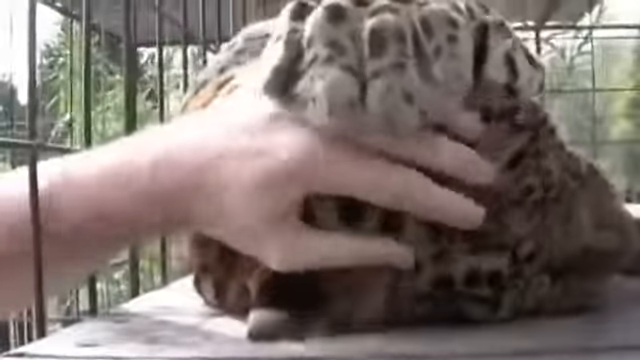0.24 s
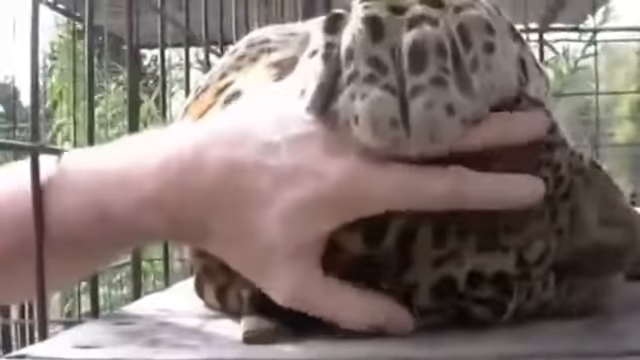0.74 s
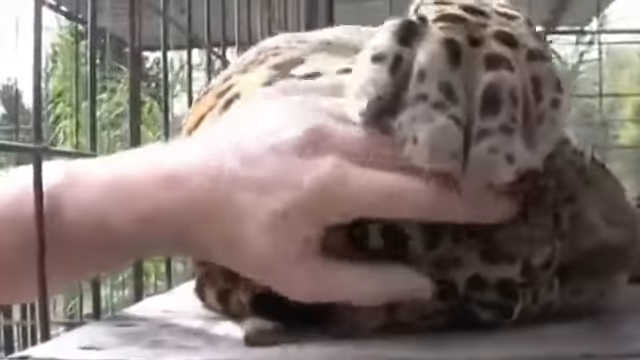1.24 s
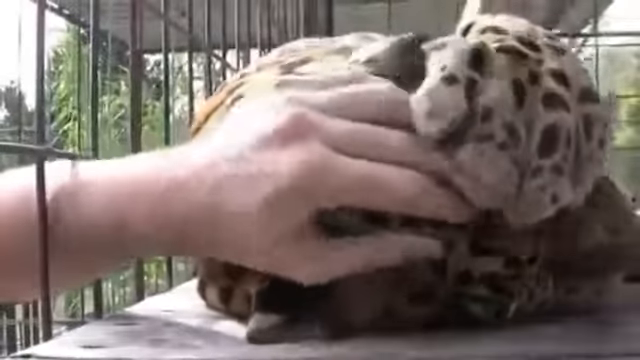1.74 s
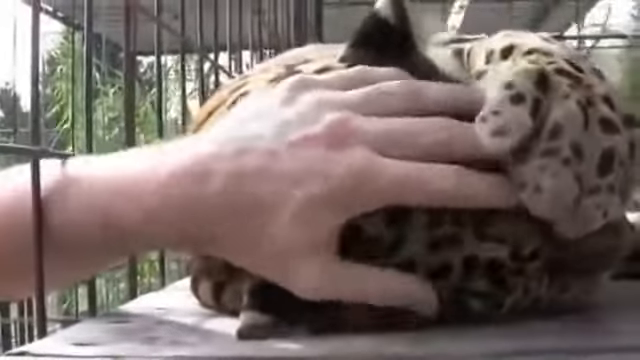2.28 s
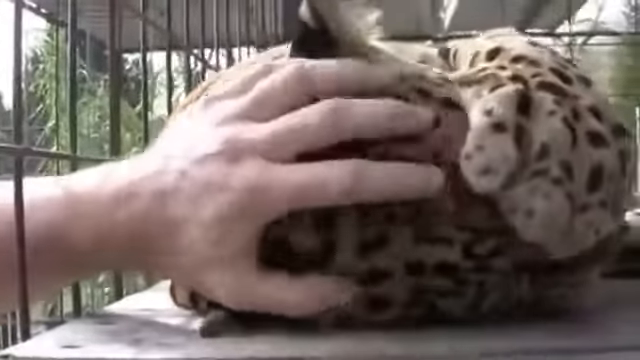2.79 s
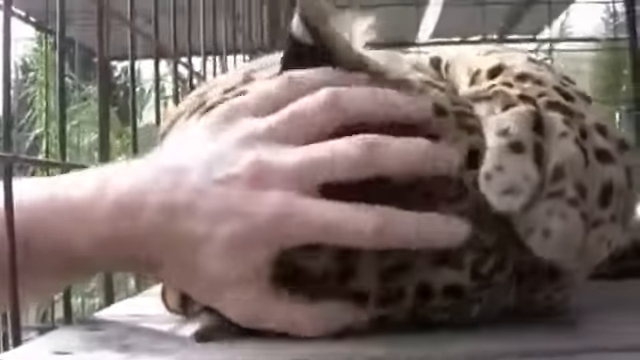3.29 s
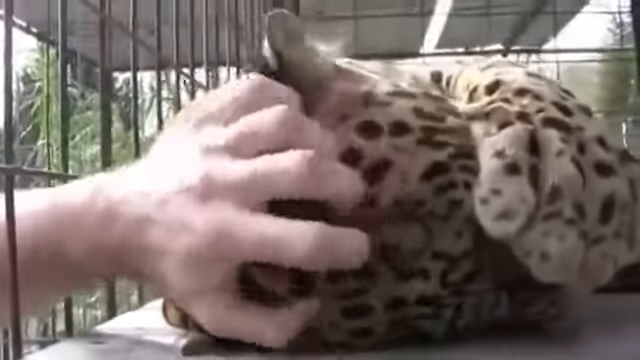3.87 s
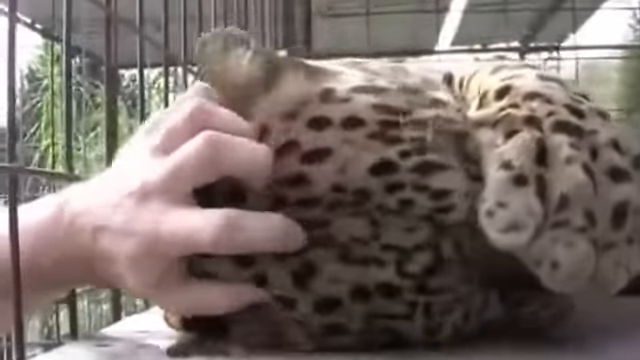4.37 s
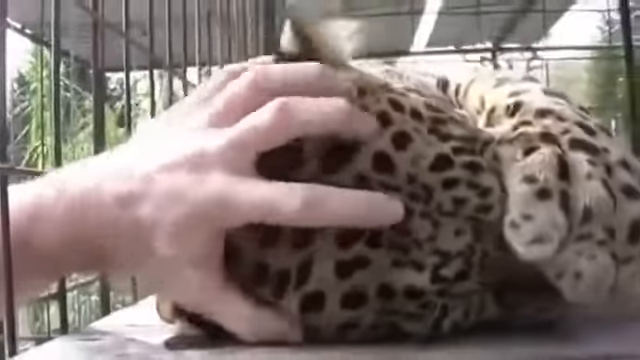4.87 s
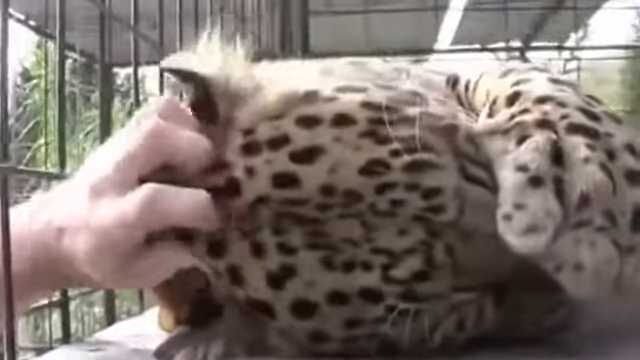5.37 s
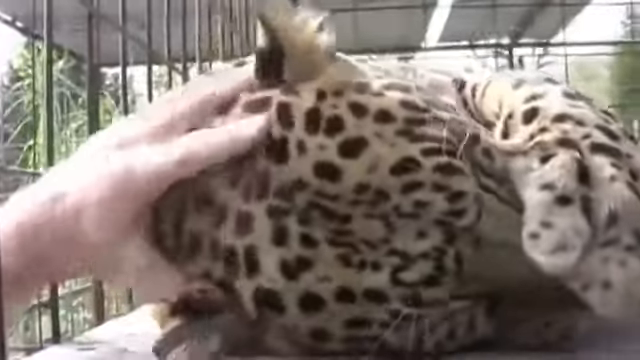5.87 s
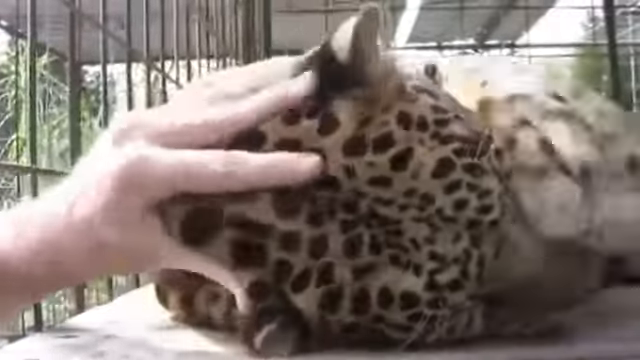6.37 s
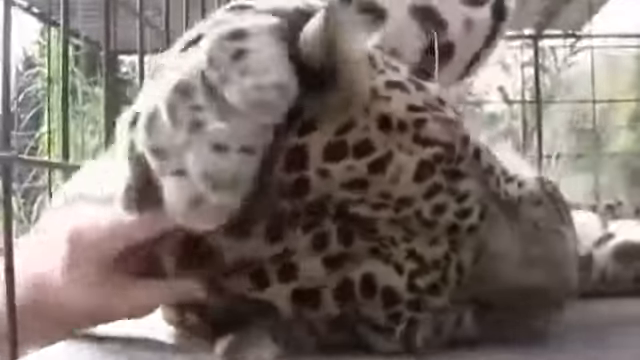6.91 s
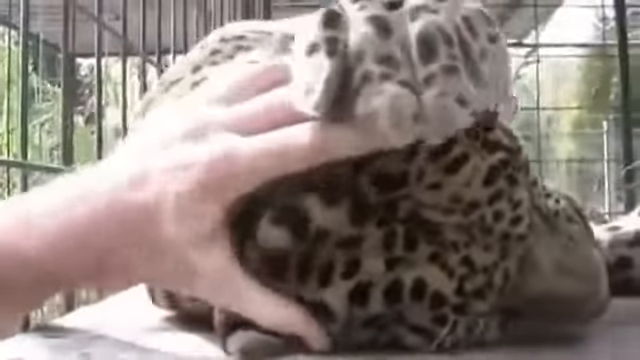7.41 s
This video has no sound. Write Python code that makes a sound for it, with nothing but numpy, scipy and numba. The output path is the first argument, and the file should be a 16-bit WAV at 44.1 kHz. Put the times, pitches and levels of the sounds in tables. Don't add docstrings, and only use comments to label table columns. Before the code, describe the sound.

A big cat growls continuously up close, a deep rattling throaty rumble of separate pulses, over leaf hiss, wind puffs and faint ticks outdoors.

```python
import sys
import numpy as np
from scipy import signal
from scipy.fft import rfft, irfft
from scipy.io import wavfile
from scipy.ndimage import uniform_filter1d
from numba import njit

SR = 44100
rng = np.random.default_rng(int(sys.argv[2]) if len(sys.argv) > 2 else 0)


def to_linear_factor(level_db):
    exponent = np.asarray(level_db, float) / 20
    return 10 ** exponent


def output_pcm(signal):
    pcm = np.clip(np.atleast_2d(signal).T, -1, 1) * 32767
    wavfile.write(sys.argv[1], SR, np.round(pcm).astype(np.int16))


N = 337365


def rows(table):
    s, *columns = np.transpose(table)
    return [np.interp(np.arange(N) / SR, s, c) for c in columns]


def unit(x):
    return x / np.sqrt(np.mean(x ** 2))


@njit
def svf(x, hz, width):
    y, b, l = np.empty((2, len(x))), 0., 0.
    for i in range(len(x)):
        g, k = np.tan(np.pi * hz[i] / SR), width[i] / hz[i]
        v = (b + g * (x[i] - l)) / (1 + g * (g + k))
        y[0, i], y[1, i] = k * (l + g * v), k * v
        b, l = 2 * v - b, l + 2 * g * v
    return y


def band(x, hz, width):
    return svf(x + 1e-18, hz + np.zeros(N), width + np.zeros(N))[1]


def two_bands(x, hz, width, outer_width):
    return unit(band(band(x, hz, width), hz, outer_width))


def high_pass(x, hz):
    return signal.sosfilt(signal.butter(2, hz, "high", fs=SR, output="sos"), x)


def soft(x, hz):
    return signal.sosfilt(signal.butter(4, hz, fs=SR, output="sos"), x)


def clicks(s, size):
    at = np.clip(s * SR, 0, N - 2)
    i, part = at.astype(int), at % 1
    return np.bincount(i, size * (1 - part), N) + np.bincount(i + 1, size * part, N)


def walk(rate):
    k = int(SR / rate)
    steps = np.repeat(rng.standard_normal(N // k + 1), k)
    return uniform_filter1d(uniform_filter1d(steps, k), k)[:N]


def swells(events, rise, fall):
    t = np.arange(N) / SR
    total = np.zeros(N)
    for s, hold, db in events:
        end = s + rise + hold + fall
        total += db * np.clip(np.minimum((t - s) / rise, (end - t) / fall), 0, 1)
    return total


# (frequency [Hz], level [dB per Hz])
LEAF_COLOUR = [(60, 3.5), (300, 5.5), (900, -11), (2000, -17), (3500, -18), (6000, -19), (9000, -20),
               (11000, -24.5)]
# (frequency [Hz], correlation [0-1])
LEAF_LIKENESS = [(100, 0.93), (2000, .8), (4500, 0.93), (9000, 0.26)]
# (time [s], hold [s], level [dB])
LEAF_STIRS = [
    (2.05, 0.21, 2.5),
    (3.45, 0.045, 3),
    (3.95, 0.023, 1.5),
    (6.85, 0.059, -1),
]


def leaves():
    f = np.log(np.arange(N // 2 + 1) * SR / N + 1)
    hz, db = np.transpose(LEAF_COLOUR)
    gain = to_linear_factor(np.interp(f, np.log(hz), db))
    hz, likeness = np.transpose(LEAF_LIKENESS)
    like = np.clip(np.interp(f, np.log(hz), likeness), 0, 1)
    noise = rfft(rng.standard_normal((2, N)))
    mid, side = irfft(noise * gain * np.sqrt([1 + like, 1 - like]), N)
    flutter_db = 0.26 * walk(16) + 1.27 * walk(70)
    level_db = -16.5 + swells(LEAF_STIRS, rise=0.2, fall=.2) + flutter_db
    return to_linear_factor(level_db) * np.array([mid + side, mid - side])


# (time [s], hold [s], level over calm [dB])
GUSTS = [
    (.5, 0.024, 22),
    (.72, .06, 21.5),
    (1.68, 0.095, 23),
    (2.28, 0.17, 19),
    (2.8, 0.014, 9.5),
    (3.75, .15, 8),
]


def wind_thumps():
    return to_linear_factor(4 * walk(25)) * unit(band(band(rng.standard_normal(N), 70., 120.), 80., 200.))


def wind():
    mid, side = wind_thumps(), wind_thumps()
    level_db = -42 + swells(GUSTS, rise=0.11, fall=.12)
    return to_linear_factor(level_db) * np.array([side + .5 * mid, .5 * mid - side])


# (time [s], peak level [dB], frequency [Hz])
TICKS = [
    (0.5336, -24.5, 4780),
    (4.17, -31.5, 4760),
    (6.834, -36, 2300),
]


def ticks():
    out = np.zeros(N)
    for s, db, hz in TICKS:
        age = np.maximum(np.arange(N) / SR - s, 0)
        fade = (age > 0) * np.exp(-age / 0.0044)
        out += to_linear_factor(db) * fade * unit(band(rng.standard_normal(N), hz, 4000.))
    return out


# (time [s], rate [slaps per s])
BEAT = [(0, 34.329), (.017, 30.028), (.85, 30.149), (1.474, 30.829), (2.089, 29.303), (2.421, 30.02),
        (3.648, 30.892), (3.752, 31.524), (3.956, 30.488), (4.351, 31.528), (4.685, 30.217), (4.94, 31.498),
        (5.183, 30.47), (5.507, 32.489), (6.289, 30.784), (6.791, 36.298), (7.165, 30.983), (7.65, 33.089)]
# (time [s], slap level [dB], rebound level over slap [dB])
FOLDS = [(0, 1.5, -3), (.5, 1, -4.5), (1.4, -0.7, -6.5), (2.4, -2, -9.5), (2.65, 1, -7.5),
         (3.6, -0.04, -2.5), (5.18, 2, -4.5), (5.3, 0, -26), (5.8, 2.5, -20), (6.42, -0.8, -21.5),
         (6.5, 3.5, -4), (6.65, 1, -3), (6.73, 2.5, -18), (6.9, 0.5, -30), (7.0, 3, -4.5), (7.1, -0.5, -6),
         (7.3, 3, -5), (7.42, 3, -12.5)]
# (time [s], hold [s], looseness [0-1])
STUMBLES = [
    (.7, .25, .7),
    (1.75, .03, .7),
    (1.95, .03, .5),
]


def fold_slaps(lag_ms):
    rate, = rows(BEAT)
    slap_db, rebound_db = rows(FOLDS)
    cycles = np.cumsum(rate) / SR - .3126
    k = np.arange(int(cycles[-1]) + 1)
    i = np.searchsorted(cycles, k)
    chance = rng.standard_normal((len(k), 5)).T
    loose = np.clip((-8 - rebound_db) / 5, 0, 1)
    scatter_ms = .8 * (loose + swells(STUMBLES, rise=.04, fall=.04))
    limp_ms = -.6 * loose[i] * (-1.) ** k
    shift_ms = limp_ms + .12 * chance[0] + scatter_ms[i] * chance[4]
    slap_s = i / SR - .0009 + 1e-3 * shift_ms
    rebound_s = slap_s + 1e-3 * (lag_ms[i] + .1 * chance[2])
    size = to_linear_factor(slap_db[i] + (.9 + .9 * loose[i]) * chance[1])
    share = to_linear_factor(rebound_db[i] + .7 * chance[3])
    return slap_s, rebound_s, size, share


def throat_ring(push, slap_s, throat_hz, width_hz, lag_ms):
    t = np.arange(N) / SR
    last_slap = np.maximum(np.searchsorted(slap_s, t + .002) - 1, 0)
    age_ms = 1e3 * (t - slap_s[last_slap])
    parted = np.clip((age_ms - lag_ms - 2) / 3, 0, 1)
    open_width_hz = 72 - .75 * np.clip(265 - throat_hz, 0, 50)
    damping_hz = width_hz + (open_width_hz - width_hz) * parted
    low, mid = svf(push + 1e-18, throat_hz, damping_hz) * SR / (2 * np.pi * damping_hz)
    ring = high_pass(low + 0.27 * mid, 85)
    slack = np.clip((width_hz - 7) / 18, 0, 1)
    nose = svf(push + 1e-18, 1.502 * throat_hz, 80 + 0 * t)[0] * SR / (2 * np.pi * 80)
    ring = ring + (0.36 * slack - .05) * band(nose, 350.0, 280.0)
    chest = unit(band(band(push, 120.0, 53.0), 73.0, 120.0))
    ring = ring + (.05 - 0.074 * slack) * chest
    return ring - 0.51 * slack * band(ring, 120.5, 92.0)


# (time [s], second resonance [Hz], third resonance [Hz], opening level [dB])
MOUTH = [(0, 1040, 1690, -30), (.25, 1196, 1750, -33), (1.2, 1183, 1717, -29.5), (2.41, 1165, 1970, -28.5),
         (2.8, 1067, 1950, -30.5), (3.32, 1010, 1935, -27.5), (3.6, 1118, 1950, -28),
         (3.92, 977, 1980, -30.5), (4.15, 1107, 1960, -27), (4.43, 1048, 1950, -29),
         (4.77, 1016, 1970, -34), (4.9, 1058, 1890, -27.5), (5.3, 1030, 1880, -27.5), (5.7, 958, 1915, -24),
         (6.56, 980, 1816, -29), (6.88, 962, 1760, -45), (7.18, 1054, 1775, -43), (7.55, 993, 1700, -28.5)]
# (frequency [Hz], width [Hz], level over second resonance [dB])
SIDE_MODES = [
    (458, 18, -22.5),
    (1267, 87, -15),
]
# (time [s], hold [s], level [dB])
PUFFED = [
    (.05, 0.065, 5.5),
    (2.65, .1, 9.5),
    (3.9, 0.42, 5),
    (4.9, 0.19, 3),
    (5.6, 0.26, -16),
    (6.48, 0.22, 6.5),
    (6.75, 0.11, 4.5),
    (7.4, .3, -2),
]
# (time [s], hold [s], level [dB])
SNARLS = [
    (2.33, 0.017, 18),
    (6.46, 0.14, 19.5),
    (7.12, 0.065, 14),
    (7.3, .3, 4.5),
]


def mouth_resonances(bright):
    second_hz, third_hz, second_db = rows(MOUTH)
    upper = two_bands(bright, second_hz, 110.0, 440.0)
    for hz, width, db in SIDE_MODES:
        upper = upper + to_linear_factor(db) * two_bands(bright, hz, width, 3 * width)
    upper = to_linear_factor(second_db + 0.5) * upper
    third_db = -38 - 0.0281 * (third_hz - 1750) + 0.37 * (second_db + 33) + 1.2 * walk(8.3)
    third_hz = third_hz * (1 + 0.036 * walk(12))
    upper = upper + to_linear_factor(third_db) * two_bands(bright, third_hz, 120.0, 340.0)
    cheek_db = -39 - 0.28 * (second_db + 30.5) + swells(PUFFED, rise=0.051, fall=0.24)
    cheek_hz = 791 * (1 + .03 * walk(4))
    upper = upper - to_linear_factor(cheek_db) * two_bands(bright, cheek_hz, 160.0, 350.0)
    lips_db = -54 + swells(SNARLS, rise=.07, fall=0.13)
    lips = two_bands(bright, 2400., 130.0, 300.) + .9 * two_bands(bright, 1450., 700., 900.)
    return upper + to_linear_factor(lips_db) * lips


# (time [s], frequency [Hz], width while the folds are shut [Hz], rebound lag [ms])
THROAT = [(0, 278, 12, 5.9), (.2, 276, 8, 5.95), (.72, 279, 8, 6.05), (1.0, 263, 8, 7.0),
          (1.08, 272, 8, 6.6), (1.4, 267, 8, 7.3), (2.7, 256, 8, 7), (3.4, 262, 22, 8.1),
          (4.4, 248, 47, 8.9), (5.18, 246, 50, 9.2), (5.3, 255, 45, 9.5), (6.3, 250, 46, 9.5),
          (6.6, 245, 38, 8.7), (6.75, 238, 38, 9.7), (6.9, 219, 35, 9.7), (7.03, 219, 15, 8.7),
          (7.25, 226, 42, 9.35), (7.5, 252, 47, 9.5)]


def growl():
    throat_hz, width_hz, lag_ms = rows(THROAT)
    slap_s, rebound_s, size, share = fold_slaps(lag_ms)
    slaps = clicks(slap_s, size)
    swell = uniform_filter1d(clicks(slap_s - .0012, size), size=70)
    push = soft(0.15 * swell - slaps - clicks(rebound_s, size * share), 570.0)
    ring = throat_ring(push, slap_s, throat_hz, width_hz, lag_ms)
    blows = slaps + clicks(rebound_s, 3.5 * size * share ** 2)
    puffs = signal.lfilter([1], [1, -np.exp(-1 / (.005 * SR))], blows) * rng.standard_normal(N)
    bright = soft(unit(-blows) + .35 * unit(puffs) + .15 * rng.standard_normal(N), 3200.)
    bright = np.roll(bright, -30)
    return ring, mouth_resonances(bright)


def cage_echo(x):
    t = np.arange(int(.12 * SR)) / SR
    fade = np.exp(-np.log(1000) * t / 0.11) * (t > .002)
    echo = rng.standard_normal((2, len(t))) * fade
    return signal.fftconvolve(high_pass(x, 450)[None], echo, axes=1)[:, :N]


def scene():
    ring, upper = growl()
    wet = cage_echo(ring + 0.94 * upper)
    cat = ring * to_linear_factor(np.array([[1.25], [-1.25]])) + upper * to_linear_factor(np.array([[.2], [-.2]]))
    return cat + to_linear_factor(-35.5) * wet + leaves() + wind() + ticks()


def roll_off(x):
    return signal.sosfilt(signal.butter(12, 10350, fs=SR, output="sos"), x)


def record(dry):
    x = high_pass(dry, 45)
    x = x / (1 + np.abs(x / 1.2) ** 5) ** (1 / 5)
    x = signal.sosfilt(signal.ellip(10, .2, 60, 10350, fs=SR, output="sos"), x)
    mix = x - .005
    return roll_off(mix)


dry = scene()
out = record(dry)
output_pcm(out)
```